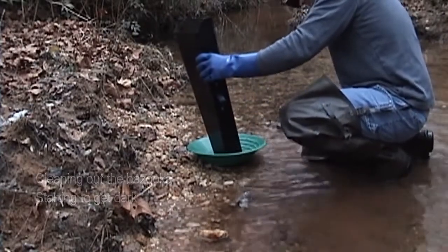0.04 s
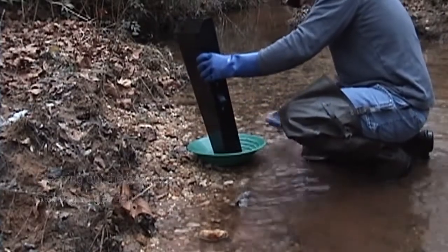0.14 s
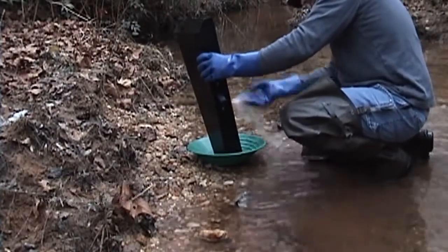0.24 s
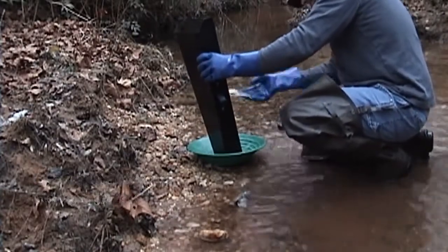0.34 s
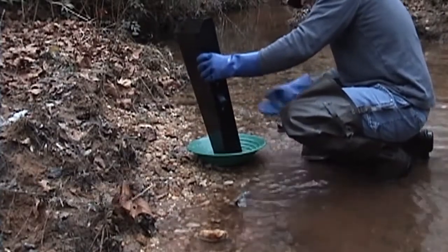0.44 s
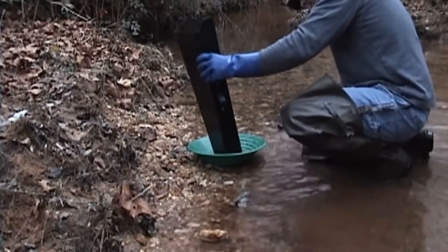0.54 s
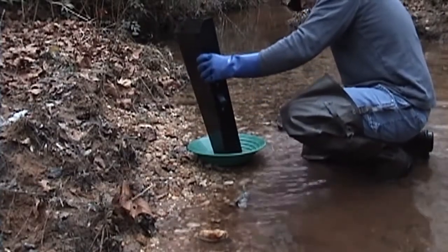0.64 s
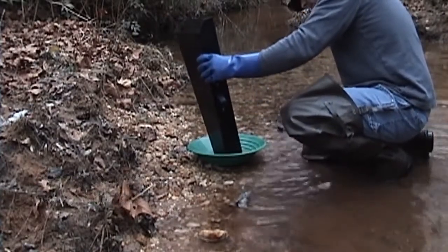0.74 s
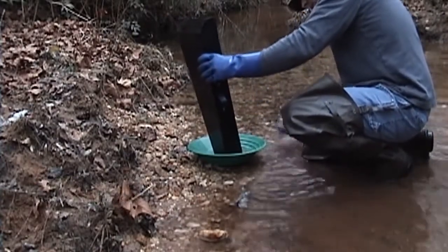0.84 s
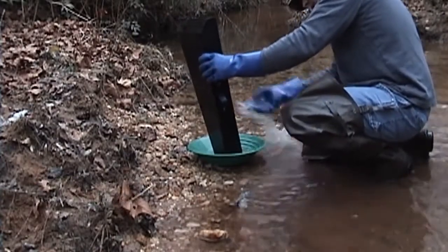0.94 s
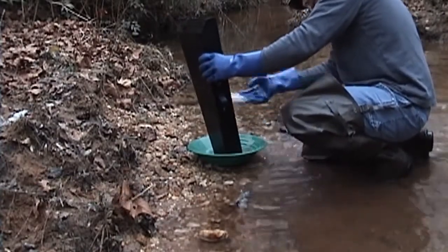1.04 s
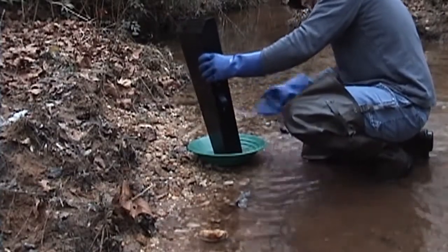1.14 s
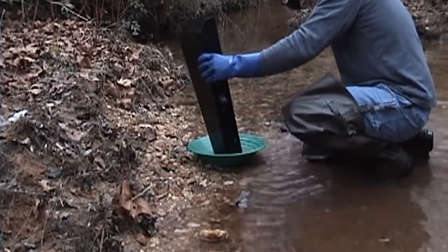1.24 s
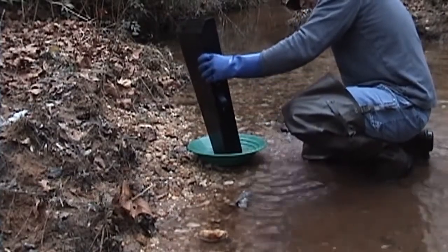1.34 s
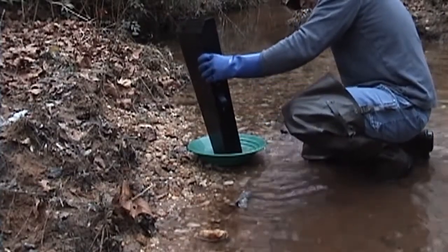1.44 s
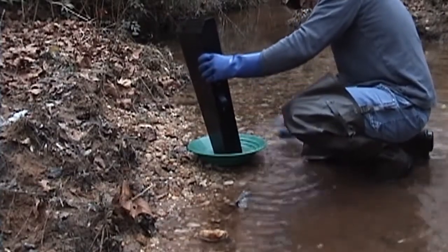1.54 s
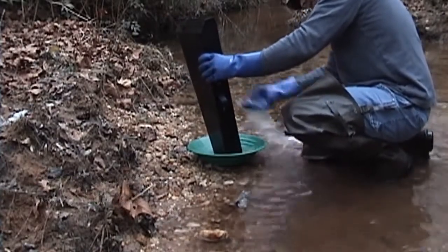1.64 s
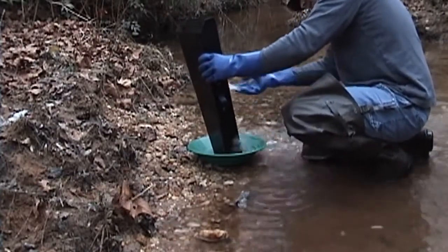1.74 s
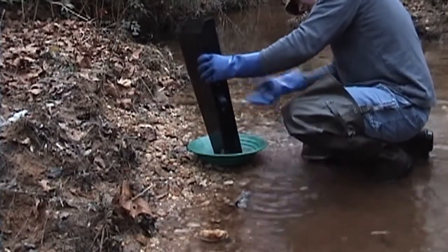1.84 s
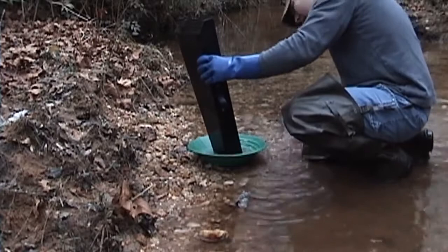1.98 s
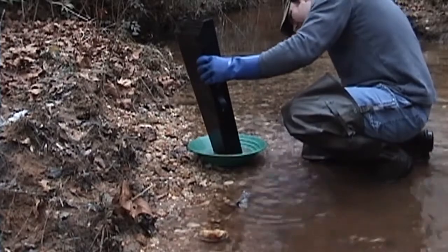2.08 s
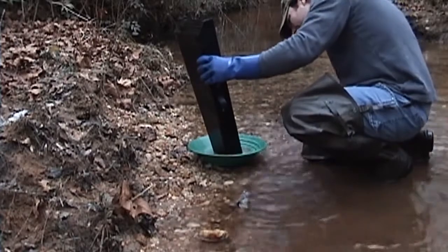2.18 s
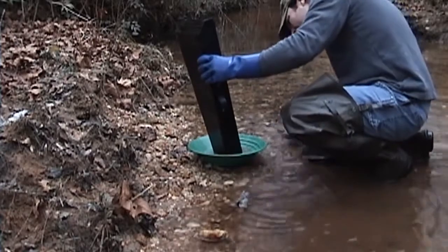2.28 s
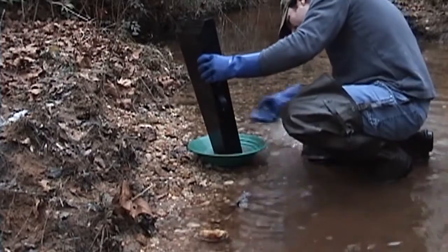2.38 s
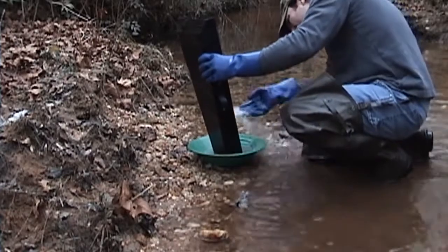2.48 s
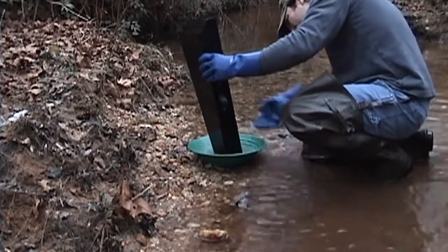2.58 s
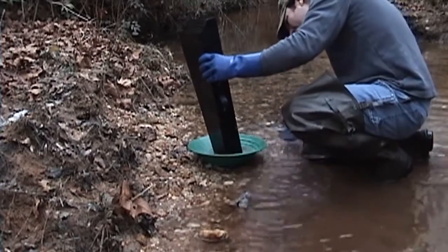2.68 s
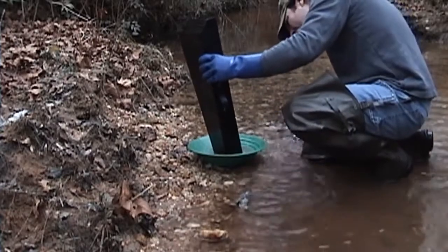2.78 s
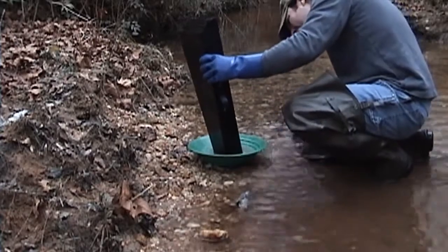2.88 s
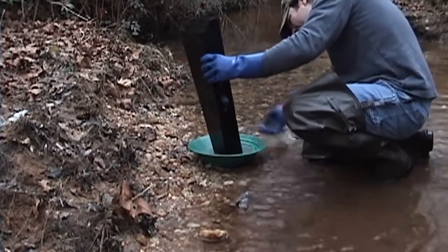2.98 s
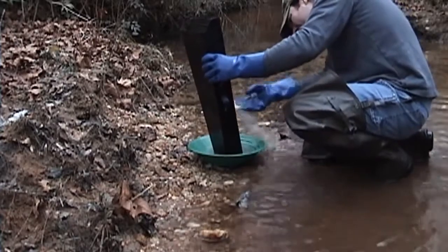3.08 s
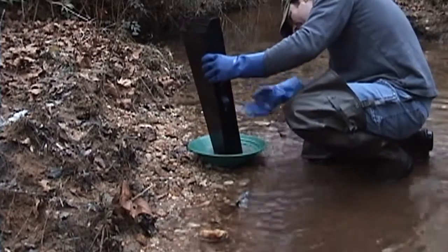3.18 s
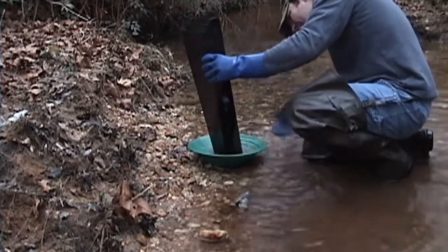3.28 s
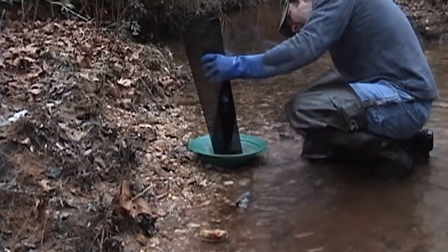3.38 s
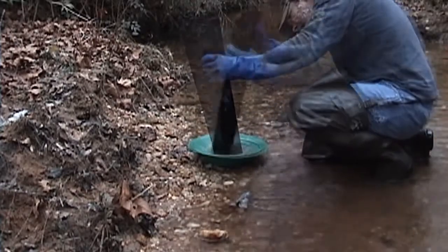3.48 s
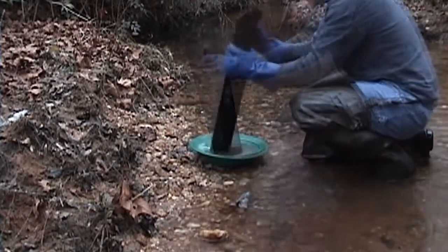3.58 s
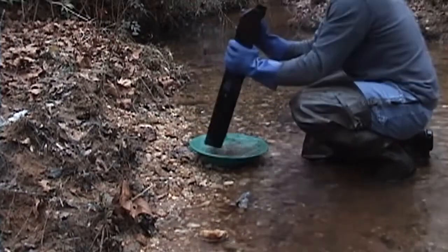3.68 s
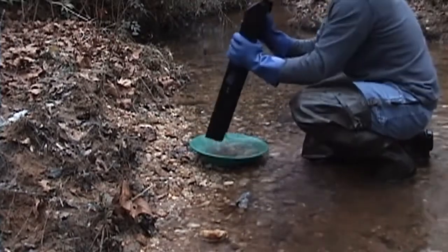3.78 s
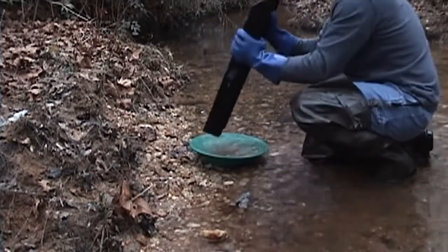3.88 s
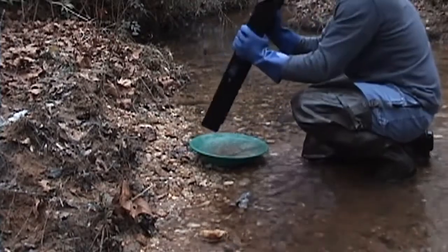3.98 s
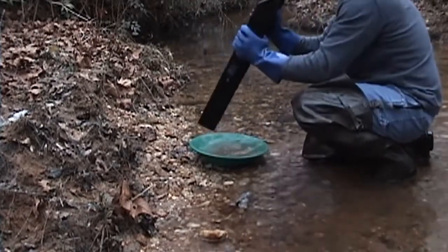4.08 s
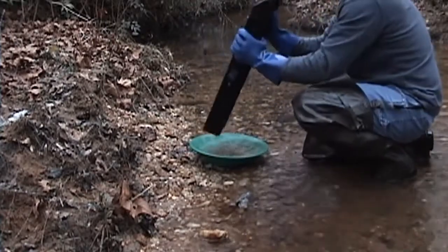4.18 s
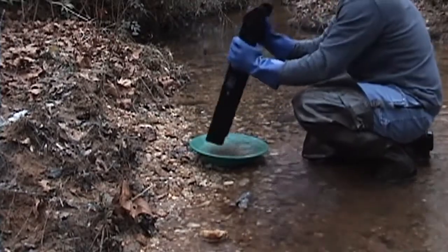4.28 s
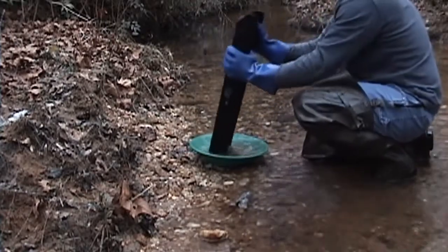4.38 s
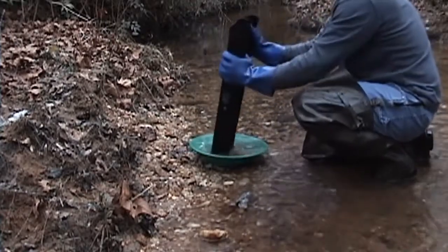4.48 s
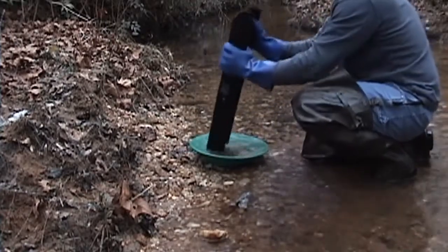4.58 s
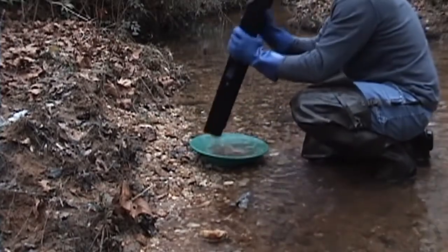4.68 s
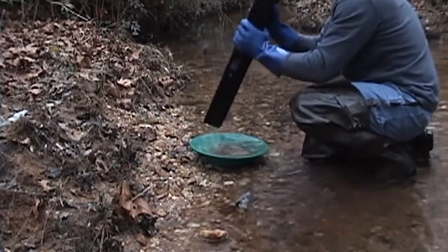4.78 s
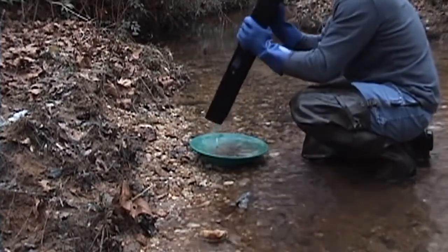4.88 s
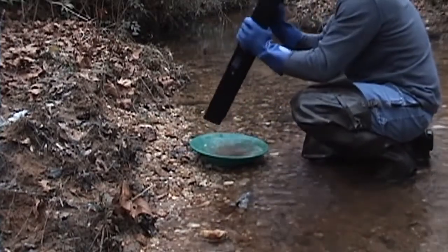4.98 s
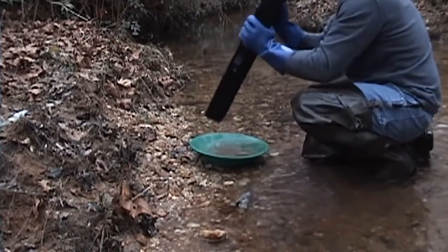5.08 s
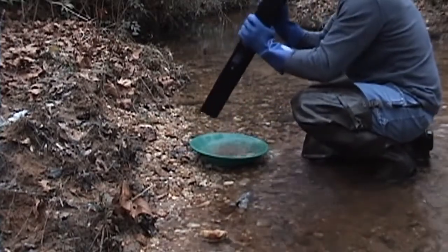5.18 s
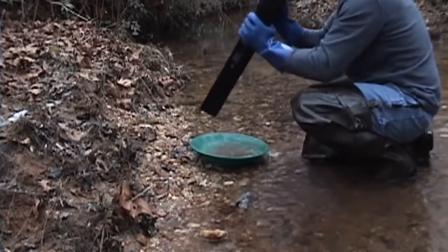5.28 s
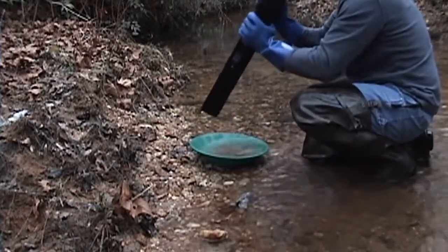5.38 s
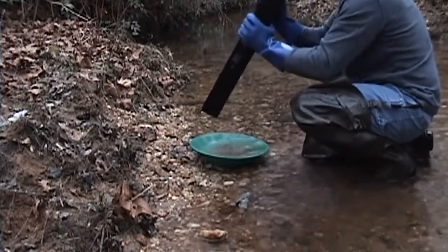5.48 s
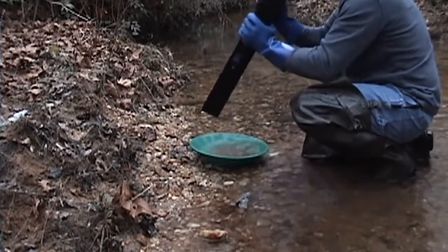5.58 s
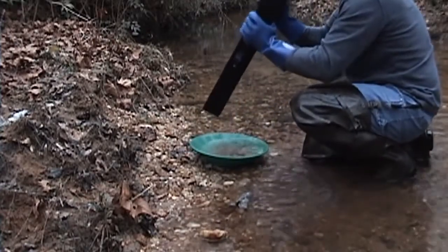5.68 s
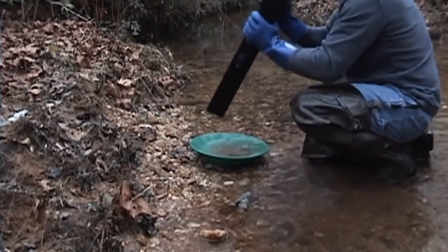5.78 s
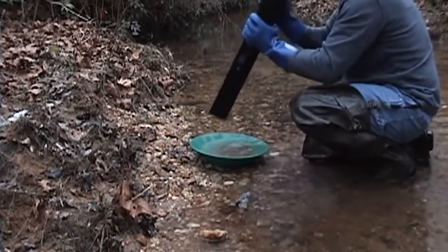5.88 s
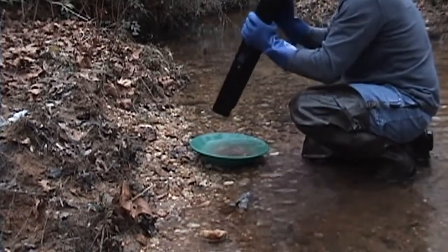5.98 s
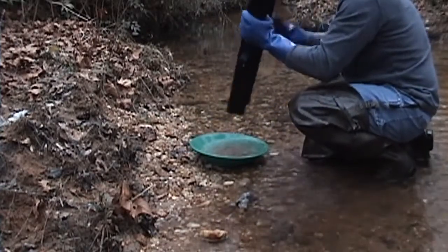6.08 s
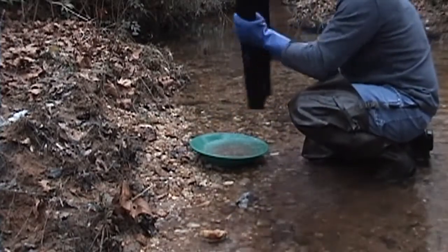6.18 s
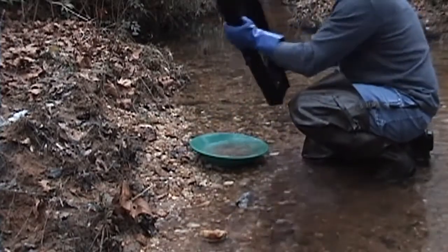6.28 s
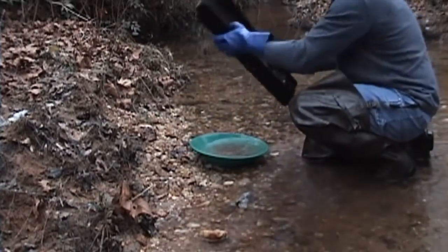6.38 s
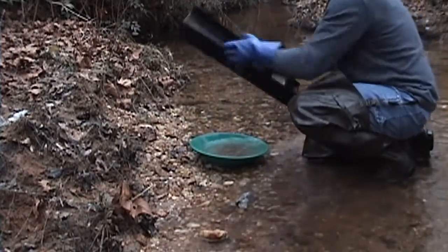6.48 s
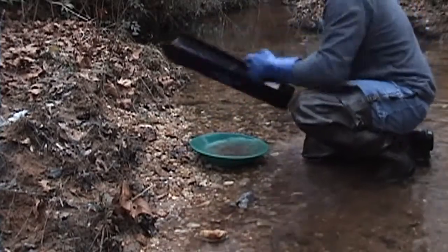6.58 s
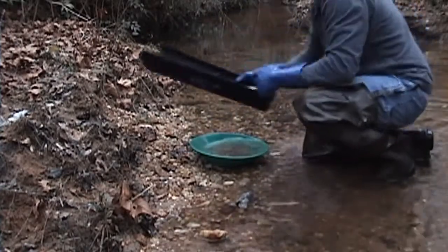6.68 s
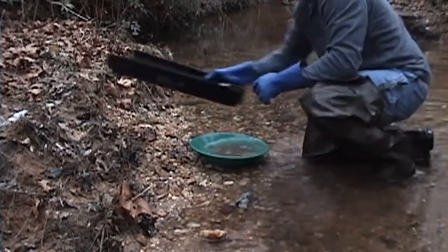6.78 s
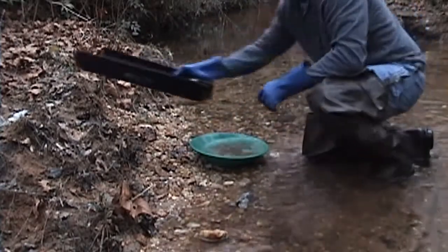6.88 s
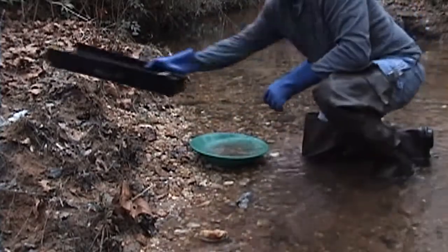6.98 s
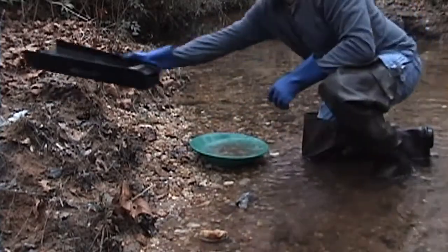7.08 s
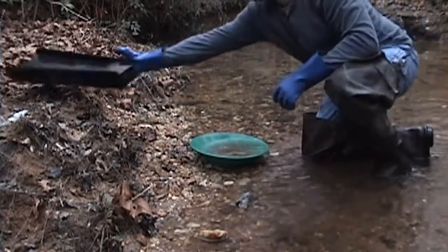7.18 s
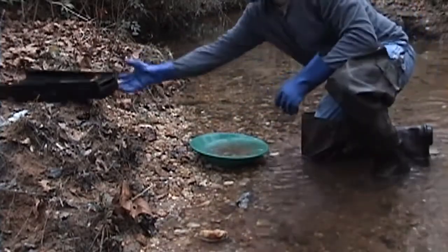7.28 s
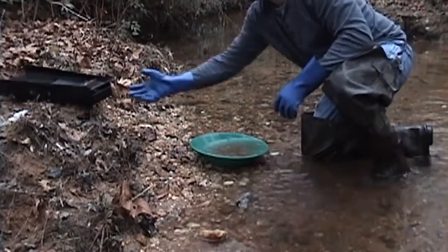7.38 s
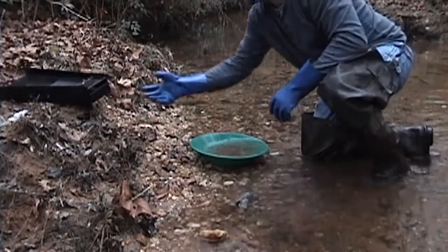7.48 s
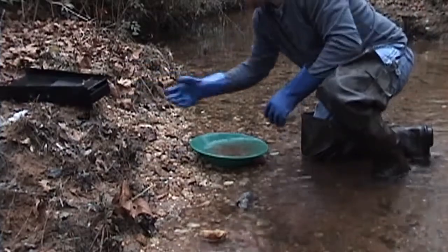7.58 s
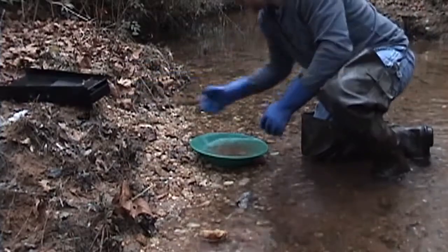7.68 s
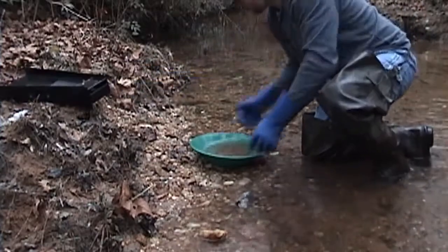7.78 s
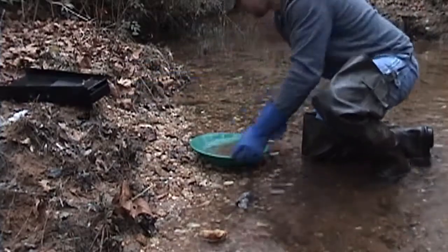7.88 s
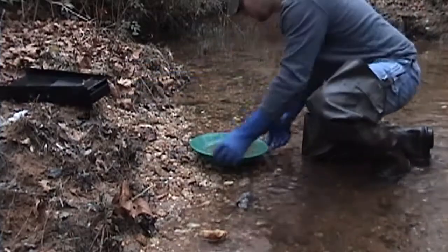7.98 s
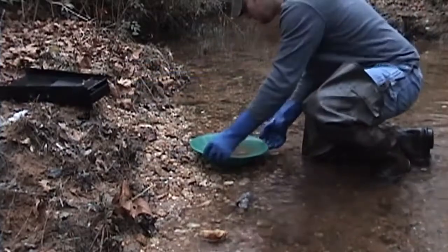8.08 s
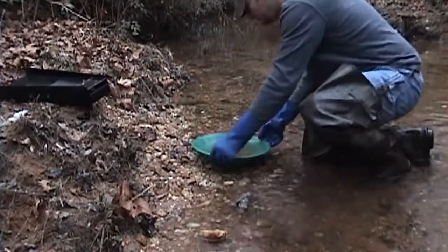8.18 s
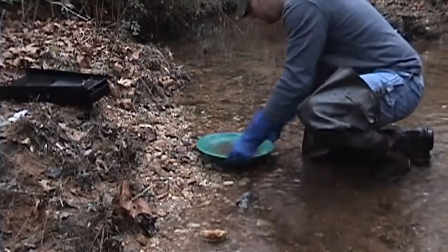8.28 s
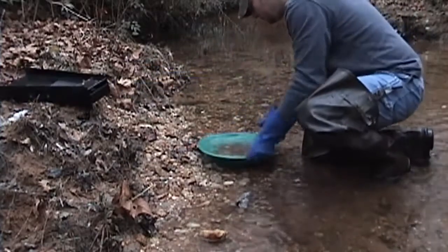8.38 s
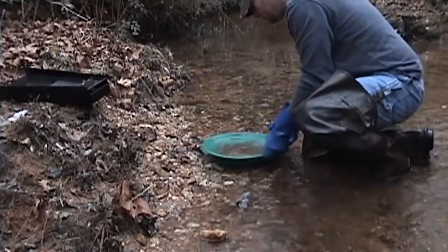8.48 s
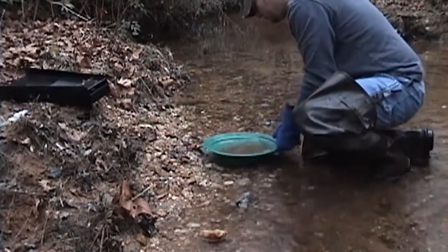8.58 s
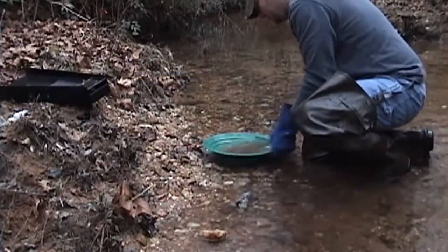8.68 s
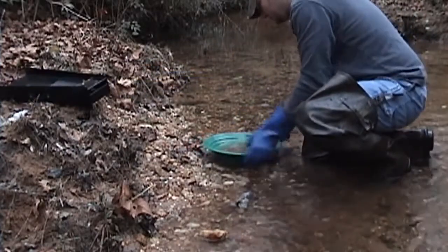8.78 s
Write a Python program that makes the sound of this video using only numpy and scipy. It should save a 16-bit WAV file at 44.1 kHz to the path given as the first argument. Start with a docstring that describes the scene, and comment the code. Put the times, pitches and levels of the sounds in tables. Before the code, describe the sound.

A shallow creek gurgles as scooped water slaps a sluice box, which drips, knocks onto the bank, and a plastic pan scrapes gravel.

```python
"""A shallow creek, gurgling throughout over a far rumble and a low wavering hum.
A gloved hand scoops water over an upright sluice box; it slaps, sprays and trickles into a plastic pan.
The box is lifted out, drips, and is dropped on the leafy bank; then the pan is shaken loose from
the gravel. Water is ringing bubbles, clicks and noise; box and pan are modes driven by blows and grit."""
import sys
import numpy as np
from scipy import signal
from scipy.io import wavfile

SR = 44100
rng = np.random.default_rng(int(sys.argv[2]) if len(sys.argv) > 2 else 0)


def int16_out(signal):
    """Quantize to a 16-bit WAV file."""
    q = np.round(np.clip(np.atleast_2d(signal).T, -1, 1) * 32767)
    wavfile.write(sys.argv[1], SR, q.astype(np.int16))


N = 389835


def from_db(db):
    return 10 ** (np.asarray(db) / 20)


def unit_rms(x):
    return x / np.sqrt(np.mean(x ** 2) + 1e-20)


def db_at_hz(spectrum, hz):
    points_hz, level_db = np.transpose(spectrum)
    return np.interp(np.log(hz), np.log(points_hz), level_db)


def per_sample(rows):
    time_s, *columns = np.transpose(rows)
    return [np.interp(np.arange(N) / SR, time_s, column) for column in columns]


def placed(x, left_db):
    return np.array([x * from_db(left_db / 2), x * from_db(-left_db / 2)])


def band(x, low_hz, high_hz):
    sos = signal.butter(2, [low_hz, min(high_hz, .45 * SR)], "band", fs=SR, output="sos")
    return signal.sosfilt(sos, x)


def add(out, start_s, sound):
    at = int(start_s * SR)
    out[..., at:at + sound.shape[-1]] += sound[..., :N - at]


def drift(rate_hz):
    """Smooth random wander, rms 1."""
    r = np.exp(-80 * np.pi * rate_hz / SR)
    slow = signal.lfilter([1], [1, -2 * r, r * r], rng.standard_normal(N // 40 + 2002))[2000:]
    return np.interp(np.arange(N) / 40, np.arange(len(slow)), unit_rms(slow))


def coloured_noise(spectrum, flicker_db, white=None):
    """Half-octave bands, each with its own level and flicker; mono, rms 1."""
    if white is None:
        white = rng.standard_normal((2, N))
    edges_hz = 22 * 2 ** np.arange(0, 10, .5)
    out = 0
    for k, (low, high) in enumerate(zip(edges_hz, edges_hz[1:])):
        if high > spectrum[0][0]:
            level_db = db_at_hz(spectrum, np.sqrt(low * high)) + flicker_db * drift(16.6)
            out = out + from_db(level_db) * band(white[k % 2], low, high)
    return unit_rms(out)


# Far creek spectrum: freq_hz, density_db
WASH_SPECTRUM = [(15, -41), (25, 1), (70, 6.5), (117, 12.5), (145, 4.5), (190, -3), (394, -15), (796, -7.5),
                 (1130, -6), (1400, -9.5), (2280, -13), (2910, -35), (7920, -26), (14800, -38),
                 (16000, -44)]


def far_wash():
    """Distant creek wash and rumble, slightly wide."""
    mid = coloured_noise(WASH_SPECTRUM, flicker_db=0.1)
    side = coloured_noise(WASH_SPECTRUM, flicker_db=1.0)
    side = from_db(-0.5) * band(band(side, 320, 16000), 320, 14000)
    return from_db(-47) * np.array([mid + side, mid - side])


def hum():
    """A low sine wavering in pitch and level."""
    pitch_hz = 127.6 + 1.25 * drift(2.1)
    return np.sin(2 * np.pi * np.cumsum(pitch_hz) / SR) * from_db(-48.5 + 0.84 * drift(5.5))


def bubble(pitch_hz, ring_s, glide_oct):
    """A damped, gliding sine: its pitch climbs or falls by glide_oct octaves per ring_s, and it stops at the
    burst."""
    ring_s = np.clip(ring_s, .002, .15)
    t = np.arange(int(ring_s * 1.8 * SR)) / SR
    age = t / ring_s
    phase = 2 * np.pi * np.cumsum(pitch_hz * 2 ** (glide_oct * age)) / SR
    attack = np.minimum(t * pitch_hz / 1.86, 1)
    return np.sin(phase) * from_db(-7.5 * age - 1.75 * age ** 3) * attack


# Bubble swarm spectrum: pitch_hz, level_db
GURGLE_SPECTRUM = [(240, -55), (400, -41), (471, -21.5), (700, -9.5), (1090, -5.5), (1780, -9), (3590, -23),
                   (6500, -24), (8450, -55), (14300, -120)]


def gurgle(rate_per_s=340):
    """Small bubbles at random times, sizes and places; rms 1."""
    out = np.zeros((2, N))
    for when, pitch, strength, life, rise, side in rng.random((int(rate_per_s * N / SR), 6)):
        hz = 400 * 15.91 ** pitch
        level_db = db_at_hz(GURGLE_SPECTRUM, hz) + 1.7 * np.log10(hz) - 2.5 * np.log(strength + 0.015)
        cycles = 10.26 * (0.13 + 2.37 * life ** 2)
        ring = from_db(level_db) * bubble(hz, cycles / hz, 0.35 * rise ** 2)
        add(out, when * N / SR, placed(ring, 11.7 * (side - .5)))
    return unit_rms(out)


def churn():
    """Strong flow blurs the bubbles into noise."""
    return coloured_noise(GURGLE_SPECTRUM, flicker_db=5.0) * from_db(2.3 * drift(35))


# Spray spectrum: freq_hz, density_db
SPRAY_SPECTRUM = [(880, -18.5), (1500, -9.5), (1620, -7), (2970, -7.5), (4730, -10.5), (5280, -9),
                  (6370, -11.5), (14600, -28), (16000, -37)]


def spray(base_rate_per_s=700):
    """Spurts of tiny droplet clicks over a fine hiss; rms 1."""
    hits = rng.random((2, N)) < base_rate_per_s * from_db(5.0 * drift(25)) / SR
    click_db = 1.5 * np.minimum(rng.exponential(1, (2, N)), 4)
    clicks = hits * from_db(click_db) * rng.choice([-1, 1], (2, N))
    white = unit_rms(clicks) + rng.standard_normal((2, N))
    mid = coloured_noise(SPRAY_SPECTRUM, flicker_db=2.0, white=white)
    side = from_db(-7.5) * coloured_noise(SPRAY_SPECTRUM, flicker_db=3.5)
    spurts = from_db(3.4 * drift(21.0))
    return unit_rms(spurts * np.array([mid + side, mid - side]))


def droplets(rate_per_s=170):
    """Lone drops tick at random, each with a short rising ring; rms 1."""
    out, t = np.zeros((2, N)), np.arange(700) / SR
    for when, pitch, strength, life, side in rng.random((int(rate_per_s * N / SR), 5)):
        hz = 1900 * 5.95 ** pitch
        t60_s = (20.0 + 79.0 * life ** 3) / hz
        tick = np.sin(2 * np.pi * hz * t * (1 + 3.6 * t)) * from_db(-60 * t / t60_s)
        level_db = db_at_hz(SPRAY_SPECTRUM, hz) + 4.4 * np.log10(hz) - 5.0 * np.log(strength + 0.01)
        add(out, when * N / SR, placed(from_db(level_db) * tick, 10.0 * (side - .5)))
    return unit_rms(out)


def slosh():
    """Deep water movement: low noise with an unsteady level."""
    low_noise = band(band(rng.standard_normal(N), 215, 396), 103, 670)
    return unit_rms(low_noise) * from_db(4.37 * drift(18.3))


# Run-off between surges: time_s, gurgle_drive, spray_db
RUNOFF = [(0.0, -39.5, -46.5), (0.7, -41, -44.5), (1.45, -39.5, -42), (2.0, -38.5, -44), (2.5, -37, -44),
          (3.1, -40, -44), (3.5, -40.5, -46), (3.89, -39, -44.5), (4.06, -61, -52), (4.5, -50, -54),
          (4.85, -45, -49.5), (5.9, -48.5, -50.5), (6.35, -42.5, -52), (6.75, -47.5, -51.5),
          (7.19, -48, -54.5), (7.78, -42, -50.5), (8.05, -52, -58), (8.4, -39, -50), (8.84, -36, -45)]
# Water scooped, thrown, or jolted with the box and pan: peak_s, gurgle_drive, spray_db, slosh_db
SURGES = [(0.171, -36.5, -42, -50.5), (0.44, -63, -41.5, -60), (0.52, -36, -32.5, -44),
          (0.89, -35, -42.5, -48.5), (1.202, -42, -28, -44.5), (1.38, -56, -38, -57),
          (1.62, -34, -48, -44.5), (1.69, -31, -55, -46.5), (1.902, -29, -29, -34.5),
          (2.16, -34, -37.5, -52.5), (2.36, -46, -49, -50), (2.68, -48, -31, -43.5), (2.78, -58, -37, -65),
          (3.05, -44, -48, -47.5), (3.15, -32, -41.5, -64), (3.348, -44, -32, -44),
          (4.658, -25, -35.5, -32), (6.44, -38, -45.5, -44.5), (7.288, -37, -46, -40),
          (7.46, -31, -28.5, -34.5), (7.528, -45, -37.5, -37), (8.518, -26, -58, -46),
          (8.59, -29.5, -59, -38), (8.67, -25, -47, -50)]


def running_water(spot_gain):
    """Each surge swells fast and drains more slowly into the run-off."""
    t = np.arange(0, N, 32) / SR
    peak_s, gurgle_peaks, spray_peaks, slosh_peaks = np.transpose(SURGES)[:, :, None]
    gurgle_calm, spray_calm = [curve[::32] for curve in per_sample(RUNOFF)]

    def surging(calm_db, peak_db, rise_db_per_s, fall_db_per_s):
        below_db = np.where(t < peak_s, rise_db_per_s * (peak_s - t), fall_db_per_s * (t - peak_s))
        power = from_db(2 * calm_db) + from_db(2 * (peak_db - below_db)).sum(axis=0)
        return np.interp(np.arange(N) / SR, t, 10 * np.log10(power))

    gurgle_drive = surging(gurgle_calm, gurgle_peaks, rise_db_per_s=300, fall_db_per_s=134)
    spray_db = surging(spray_calm, spray_peaks, rise_db_per_s=345, fall_db_per_s=134)
    slosh_db = surging(-63, slosh_peaks, rise_db_per_s=412, fall_db_per_s=176)
    deep = from_db(slosh_db) * slosh()
    surface = from_db(0.76 * gurgle_drive - 14.0) * gurgle()
    surface += from_db(1.18 * gurgle_drive + 0.5) * churn()
    surface += from_db(spray_db) * spray()
    surface += from_db(0.72 * spray_db - 16.0) * droplets()
    return surface * spot_gain + deep


SCATTER_DB = 1.5  # left-right spread of single splats and bubbles
# Drops and slaps on a surface: start_s, level_db, body_re_crack_db
SPLATS = [(0.1715, -29, 3.5), (0.415, -21.5, -23), (0.498, -25, 3), (0.5938, -22, -23), (0.6378, -22.5, -9),
          (0.9036, -26.5, 7), (0.928, -22.5, -13), (1.053, -22.5, -6), (1.1547, -24, -1),
          (1.2003, -31, -12), (1.3714, -25, -6), (1.387, -19.5, -18), (1.404, -16, -27), (1.479, -22, -22),
          (1.618, -28.5, 9.5), (1.8001, -32, 12.5), (1.8377, -22, -5), (1.8781, -32, -18),
          (1.8963, -3.5, -6), (1.949, -17.5, -10), (2.029, -21, -6), (2.0574, -19.5, -16), (2.1014, -6, -2),
          (2.158, -19.5, -3), (2.775, -24, -21), (2.788, -19, -18), (2.8863, -21.5, -21),
          (2.946, -25.5, -13), (3.2863, -15.5, -5), (3.341, -17.5, -8), (3.3775, -24, -6),
          (3.4121, -24.5, -24), (3.7842, -26, 0), (4.0756, -20, -19), (4.182, -29.5, -9), (4.2, -30.5, -20),
          (4.3, -34, -36), (4.376, -27, -4.5), (4.576, -26, -8), (4.628, -15, -3), (4.6363, -10.5, 0),
          (4.644, -13, 2.5), (4.992, -25.5, -24), (5.0792, -30.5, -14), (5.3316, -29.5, -2),
          (5.402, -25.5, -10), (5.4344, -27, -2), (5.6975, -29, -36), (5.7342, -33, -15),
          (5.875, -30.5, -15), (6.064, -24.5, -10), (6.2626, -26, -26), (6.42, -29, -8),
          (6.557, -28.5, -11), (6.723, -31, -17), (6.782, -32, -27), (6.83, -34, -32), (7.003, -35, -20),
          (7.2553, -28, -9), (7.391, -31, -18), (7.431, -19.5, -2), (7.5141, -9.5, -6.5),
          (7.5684, -22, -12), (7.583, -24, -10), (7.909, -29, -17), (8.257, -24.5, -14)]


def splats():
    """Noise bursts of crack and duller body: bigger drops last longer, thinner ones crack brighter."""
    out, t = np.zeros((2, N)), np.arange(2600) / SR
    attack = np.minimum(t / 0.00099, 1)
    for (start_s, level_db, body_db), left_db in zip(SPLATS, rng.normal(0, SCATTER_DB, len(SPLATS))):
        noise = rng.standard_normal((2, len(t)))
        t60_s = 0.024 * from_db(0.14 * (level_db + 11))
        decay = from_db(-60 * t / t60_s)
        sizzle = from_db(-22.5 - 0.5 * body_db) * band(noise[0], 4200, 14300)
        crack = unit_rms(band(noise[0], 2150, 6960) + sizzle) * decay
        body = unit_rms(band(noise[1], 770, 2500)) * from_db(body_db - 60 * t / (2.18 * t60_s))
        energy_trim = np.sqrt(np.mean(decay ** 2) / np.mean(crack ** 2))
        burst = from_db(level_db - 5.5) * energy_trim * (crack + body) * attack
        add(out, start_s, placed(burst, left_db))
    return out


# Prominent bubbles: start_s, level_db, pitch_hz, ring_s, glide_oct
BUBBLES = [(0.272, -35, 1410, 0.031, 0.25), (0.523, -32.5, 1104, 0.022, -0.51),
           (0.871, -29, 1086, 0.03, -0.0084), (1.133, -30, 1700, 0.013, 0.24),
           (1.157, -25, 657, 0.04, -0.0018), (1.167, -22, 1780, 0.0068, -0.039),
           (1.182, -20.5, 2150, 0.0084, -0.14), (1.194, -16.5, 1620, 0.0061, 0.0057),
           (1.235, -31, 870, 0.018, -0.13), (1.681, -26.5, 1178, 0.0292, 0.29),
           (1.725, -28.5, 2180, 0.013, 0.23), (1.8, -37, 725, 0.022, 0.011),
           (1.9, -11.5, 613, 0.007, -0.075), (2.103, -12, 960, 0.011, 0.22),
           (2.13, -23.5, 900, 0.0086, -0.15), (2.165, -21, 1370, 0.0058, -0.43),
           (2.239, -26, 1090, 0.007, -0.16), (2.296, -31, 1120, 0.017, 0.02),
           (2.474, -22.5, 2390, 0.0057, 0.05), (2.607, -22.5, 1495, 0.0093, 0.15),
           (2.63, -32.5, 1585, 0.027, 0.11), (2.634, -21, 2700, 0.0046, 0.01),
           (2.647, -31, 1250, 0.017, 0.27), (2.699, -35, 750, 0.033, 0.13),
           (2.939, -33, 790, 0.028, -0.022), (3.1, -26.5, 1315, 0.01, 0.12),
           (3.342, -35, 1570, 0.029, 0.073), (3.375, -31.5, 590, 0.025, -0.04),
           (3.588, -23, 615, 0.021, 0.11), (3.616, -33.5, 588, 0.022, 0.15), (3.671, -25, 498, 0.024, 0.1),
           (3.703, -18.5, 600, 0.0046, 0.067), (3.763, -26.5, 572, 0.02, -0.024),
           (3.785, -25, 554, 0.012, -0.093), (3.876, -37, 1083, 0.026, -0.013),
           (4.035, -28, 1900, 0.0073, -0.051), (4.057, -37, 1665, 0.015, 0.032),
           (4.089, -35, 1145, 0.019, -0.047), (4.195, -38, 1126, 0.017, 0.34),
           (4.277, -35.5, 574, 0.045, 0.84), (4.343, -43, 560, 0.02, 0.45), (4.397, -37.5, 815, 0.02, 0.24),
           (4.525, -38, 1125, 0.029, 0.13), (4.558, -34, 381, 0.021, 0.091),
           (4.577, -23, 1020, 0.011, -0.07), (4.608, -32, 560, 0.013, 0.05),
           (4.639, -18.5, 737, 0.015, 0.08), (4.685, -21.5, 618, 0.021, -0.34),
           (4.722, -21.5, 2200, 0.0059, -0.087), (4.759, -28, 900, 0.0081, -0.016),
           (4.798, -34.5, 862, 0.032, -0.09), (4.984, -33.5, 830, 0.011, -0.09),
           (5.017, -34.5, 1180, 0.027, 0.34), (5.051, -29.5, 1170, 0.0077, -0.12),
           (5.105, -32, 1847, 0.0072, -0.13), (5.164, -33.5, 880, 0.035, 0.64),
           (5.201, -23, 1880, 0.004, 0.02), (5.348, -29.5, 970, 0.011, -0.19),
           (5.446, -26, 750, 0.025, -0.19), (5.621, -36.5, 796, 0.061, 0.23),
           (5.696, -32, 2680, 0.0057, -0.03), (5.754, -32, 656, 0.027, 0.13),
           (5.802, -36.5, 924, 0.015, 0.31), (5.875, -34.5, 1450, 0.013, 0.25),
           (6.067, -30.5, 1680, 0.0088, 0.055), (6.157, -39, 607, 0.12, 0.53),
           (6.335, -33.5, 1305, 0.015, -0.063), (6.415, -30, 1800, 0.013, 0.12),
           (6.615, -32.5, 1277, 0.01, 0.04), (6.645, -31, 1430, 0.011, 0.15),
           (6.699, -26.5, 1670, 0.0047, -0.034), (6.888, -39.5, 595, 0.032, 0.085),
           (7.603, -27.5, 1920, 0.0074, -0.12), (7.79, -29.5, 713, 0.031, 0.35),
           (7.841, -35, 934, 0.048, -0.42), (7.859, -26, 884, 0.01, 0.17), (7.989, -42.5, 506, 0.052, 0.14),
           (8.062, -35, 2250, 0.0058, -0.002), (8.166, -36, 2210, 0.0068, -0.04),
           (8.199, -32, 1046, 0.013, -0.05)]


def single_bubbles():
    """Bubbles that stand out; the moving water around them makes their strength flutter."""
    out = np.zeros((2, N))
    for (start_s, level_db, *ring), left_db in zip(BUBBLES, rng.normal(0, SCATTER_DB, len(BUBBLES))):
        add(out, start_s, placed(from_db(level_db) * bubble(*ring), left_db))
    return out * from_db(3.3 * drift(106))


def struck(blows, modes, gain_db, contact_s):
    """Each blow is a short rough contact that excites every mode with a strength of its own."""
    out, t = np.zeros(N), np.arange(7000) / SR
    for start_s, level_db in blows:
        ring = 0
        for hz, mode_db, t60_s in modes:
            envelope = from_db(mode_db + rng.normal(0, 1.8) - 60 * t / t60_s)
            ring = ring + envelope * np.sin(2 * np.pi * hz * t)
        rough = rng.standard_normal(400)
        contact = np.abs(rough) ** 3 * np.sign(rough + 1.2) * np.exp(-t[:400] / contact_s)
        knock = signal.fftconvolve(ring, contact)
        add(out, start_s, from_db(level_db + gain_db) * knock / np.abs(knock).max())
    return out


def dragged(curve, modes, rate_per_s, tilt_db_per_oct, damping):
    """Grit catches on the body as uneven clicks; the contact damps its modes."""
    time_s, level_db = np.transpose(curve)
    t = np.arange(time_s[0], time_s[-1], 1 / SR)
    catches = (rng.random(len(t)) < rate_per_s / SR) * rng.standard_normal(len(t))
    clicks = catches * from_db(3.9 * np.minimum(rng.exponential(1, len(t)), 3)) + 1e-18
    sound = 0.67 * band(clicks, 1500, 9000)  # the grit's own crunch
    for hz, mode_db, t60_s in modes:
        r, step_rad = from_db(-60 * damping / (t60_s * SR)), 2 * np.pi * hz / SR
        force = clicks * rng.uniform(-1.08, 1, len(t))
        ring = signal.lfilter([np.sin(step_rad)], [1, -2 * r * np.cos(step_rad), r * r], force)
        sound += from_db(mode_db + tilt_db_per_oct * np.log2(hz / 1000)) * ring
    out = np.zeros(N)
    add(out, time_s[0], unit_rms(sound) * from_db(np.interp(t, time_s, level_db)))
    return out


# Sluice box resonances: pitch_hz, level_db, t60_s
BOX_MODES = [(159, -3.5, 0.14), (211, -6.5, 0.17), (278, 3.5, 0.26), (313.5, 0.5, 0.13), (532, 1, 0.12),
             (890, -15, 0.16), (1115, -6, 0.073), (1850, -33, 0.15), (2570, -8.5, 0.012),
             (3250, -16, 0.024), (3680, -20.5, 0.026), (4170, -20, 0.02)]
# Blows on the box: start_s, level_db
BOX_BLOWS = [(0.475, -21), (1.201, -23), (2.669, -19.5), (3.342, -28), (4.627, -37), (4.661, -13),
             (6.454, -16.5), (6.553, -22.5), (6.599, -27.5), (7.261, -22.5), (7.298, -17), (7.446, -10),
             (7.514, -17), (7.57, -40)]
# Two curves, grinding in the pan, then skidding over leaves and stones: time_s, level_db
BOX_DRAGS = [
    [(4.62, -63), (4.63, -25), (4.7, -69)],
    [(7.41, -74), (7.432, -31), (7.506, -32.5), (7.75, -54.5)],
]


def sluice_box():
    """The box rings as it is knocked and dragged."""
    sound = struck(BOX_BLOWS, BOX_MODES, gain_db=-7.0, contact_s=0.0026)
    for curve in BOX_DRAGS:
        sound += dragged(curve, BOX_MODES, rate_per_s=2800, tilt_db_per_oct=10.5, damping=4.2)
    return band(sound, 195, 15000)


# Soft bumps of the box: start_s, level_db
BOX_THUDS = [(1.203, -28.5), (4.655, -23.5), (6.454, -25.5), (7.44, -22), (7.513, -14), (7.572, -28)]


def box_thuds():
    """Bumped flat and soft, the box sounds only its deep modes."""
    modes = [(hz, mode_db - 24.0 * np.log2(hz / 250), t60_s) for hz, mode_db, t60_s in BOX_MODES[1:4]]
    return band(struck(BOX_THUDS, modes, gain_db=-1, contact_s=0.00074), 170, 900)


# Pan resonances: pitch_hz, level_db, t60_s
PAN_MODES = [(394, -35, 0.1), (566, -4, 0.062), (653, 4.5, 0.092), (877, 3.5, 0.044), (1072, 9, 0.037),
             (1213, 7, 0.066), (1640, 1, .04), (2073, 1, 0.051), (2850, -3, 0.013)]
# Knocks on the pan: start_s, level_db
PAN_KNOCKS = [(8.322, -20.5), (8.395, -16), (8.419, -27), (8.458, -18.5), (8.503, -10), (8.524, -26),
              (8.58, -12.5), (8.591, -14.5), (8.609, -18), (8.654, -11), (8.667, -7.5), (8.687, -12),
              (8.738, -28), (8.755, -18)]
# Pan grinding on gravel: time_s, level_db
PAN_DRAG = [(8.28, -53), (8.408, -31.5), (8.534, -45), (8.592, -31.5), (8.84, -33.5)]


def plastic_pan():
    """The pan knocks and grinds as it is shaken loose from the gravel."""
    knocks = struck(PAN_KNOCKS, PAN_MODES, gain_db=0.0, contact_s=0.0044)
    grind = dragged(PAN_DRAG, PAN_MODES, rate_per_s=1500, tilt_db_per_oct=-8.0, damping=2.7)
    return band(knocks + grind, 370, 13000)


# Where the water falls: time_s, left_re_right_db
WATER_SPOT = [(0.0, -1.5), (0.98, 0), (3.84, -0.5), (4.36, -6.5), (4.53, -1), (5.86, -5.5), (6.94, -6),
              (7.63, 2), (7.95, -8), (8.42, -1.5), (8.84, 1)]


def scene():
    """All sources; the near events get one dull echo from the bank."""
    spot_gain = placed(np.ones(N), per_sample(WATER_SPOT)[0])
    water = running_water(spot_gain)
    near = sluice_box() + plastic_pan() + (single_bubbles() + splats()) * spot_gain + box_thuds()
    echo = from_db(-13.5) * band(near[::-1], 350, 5000)  # channels swapped
    add(near, start_s=.007, sound=echo)
    return water + near + far_wash() + hum()


def record(dry):
    """Steep low-pass on the top treble."""
    stop_hz = 16400
    return signal.sosfilt(signal.cheby2(14, 70, stop_hz, fs=SR, output="sos"), dry)


dry = scene()
out = record(dry)
int16_out(out)
```